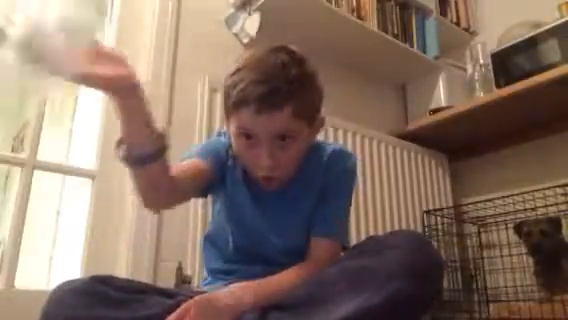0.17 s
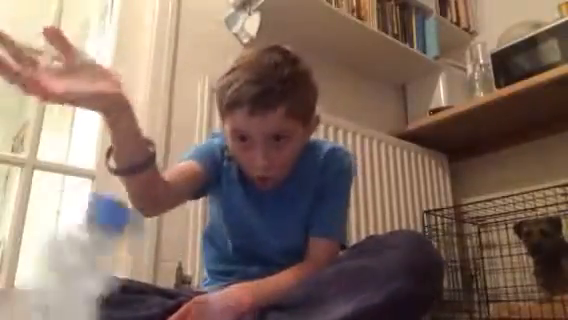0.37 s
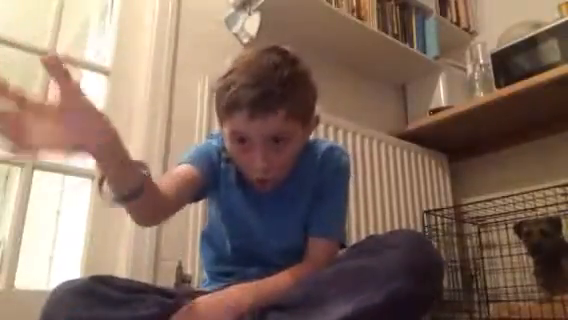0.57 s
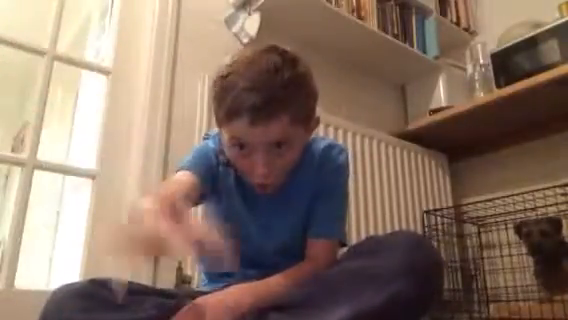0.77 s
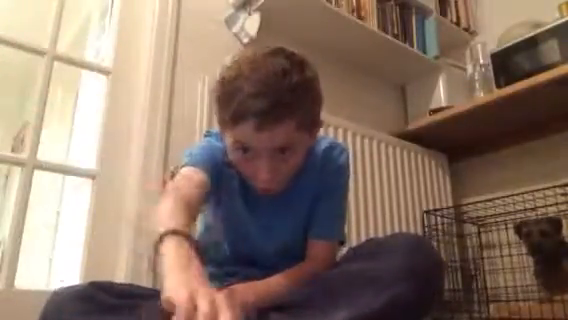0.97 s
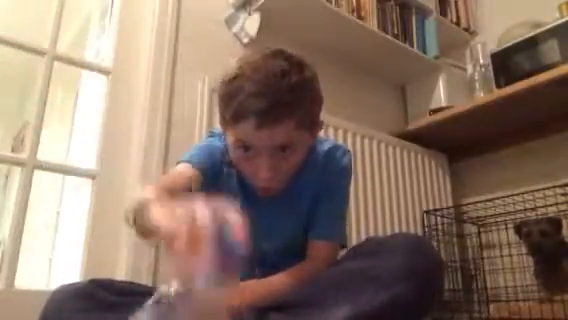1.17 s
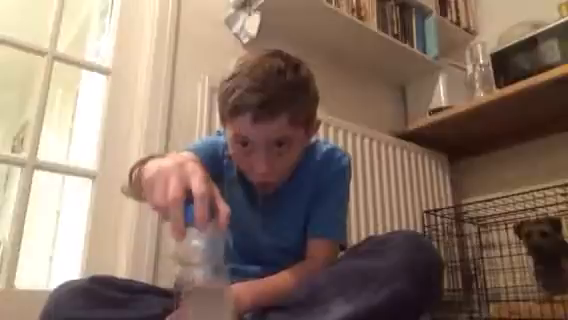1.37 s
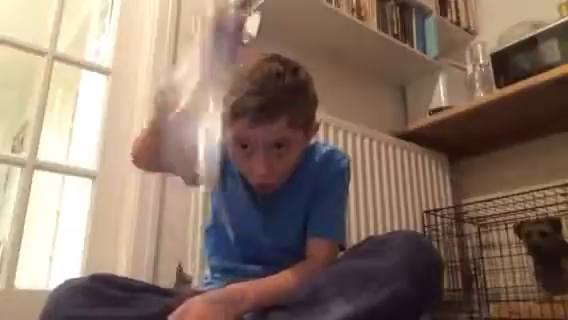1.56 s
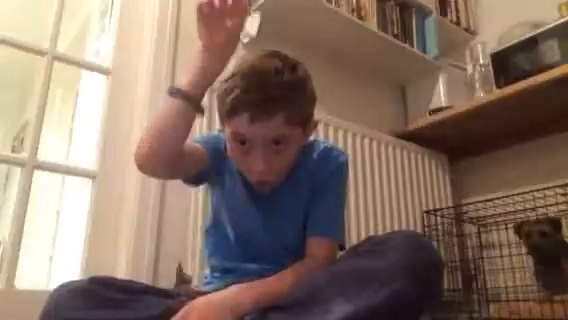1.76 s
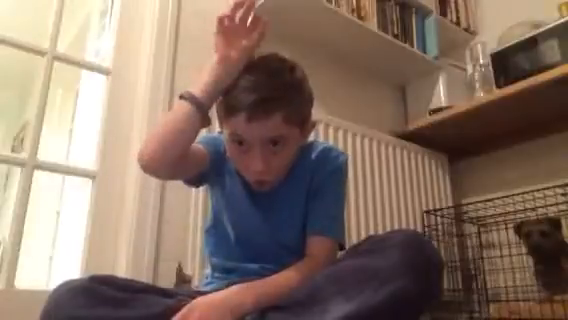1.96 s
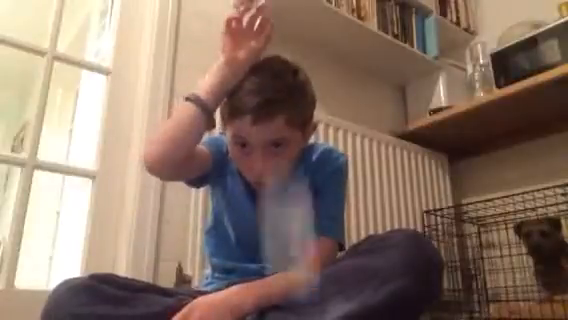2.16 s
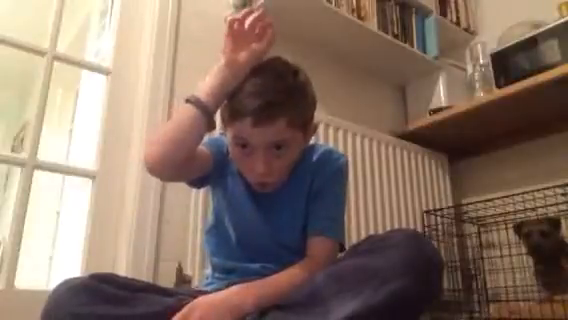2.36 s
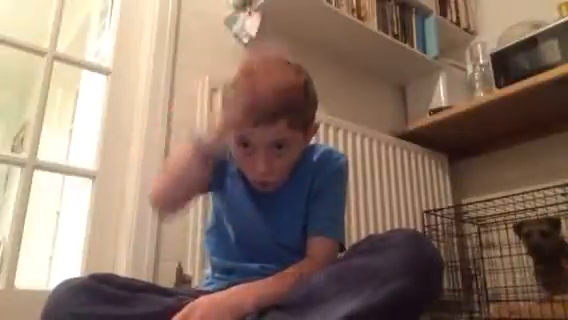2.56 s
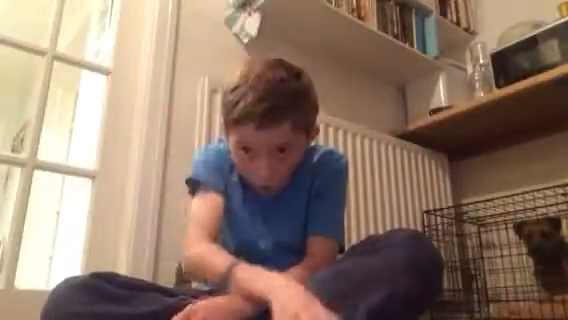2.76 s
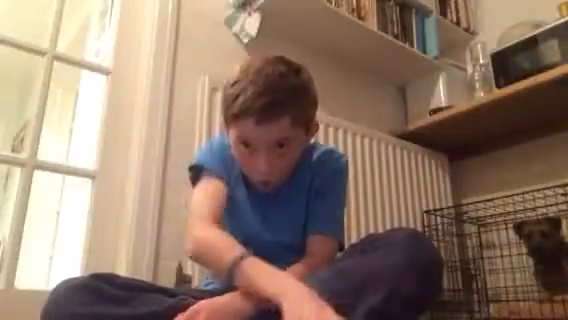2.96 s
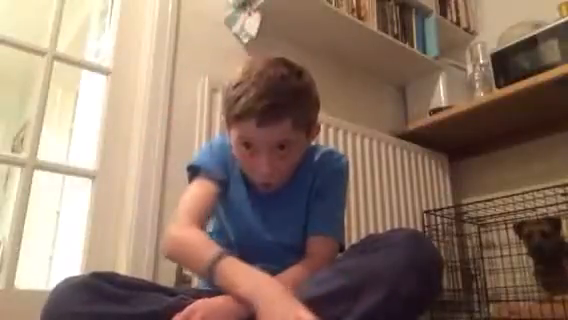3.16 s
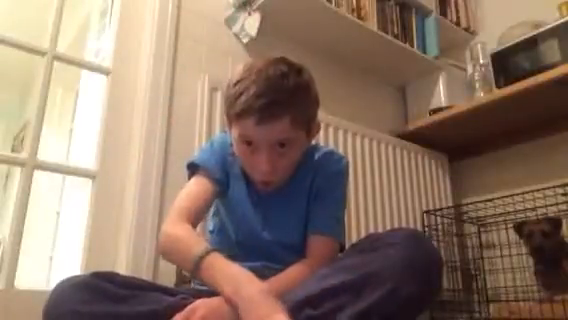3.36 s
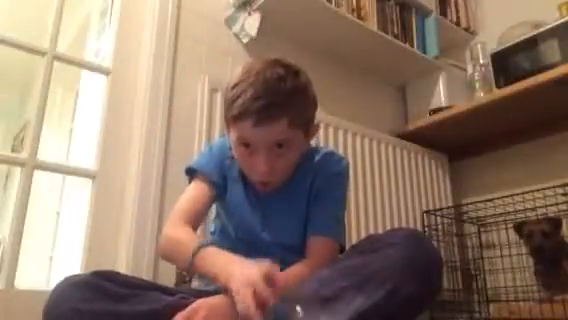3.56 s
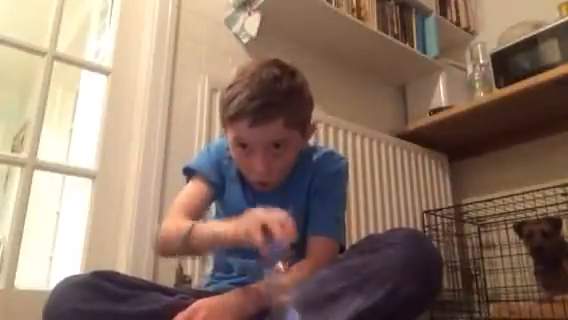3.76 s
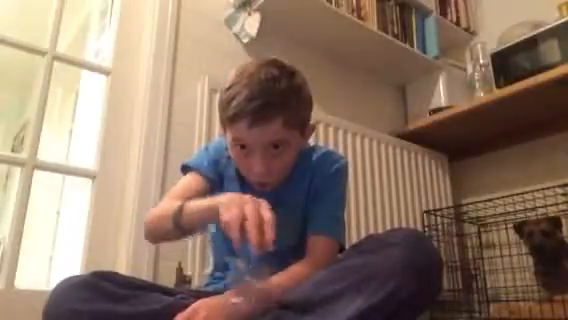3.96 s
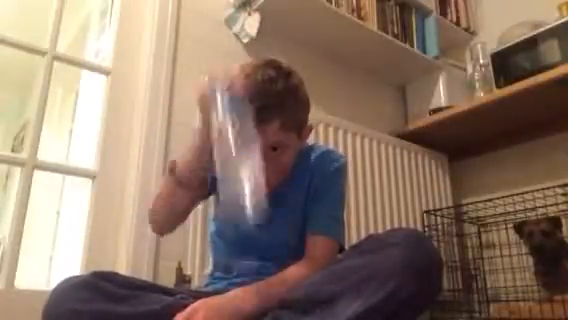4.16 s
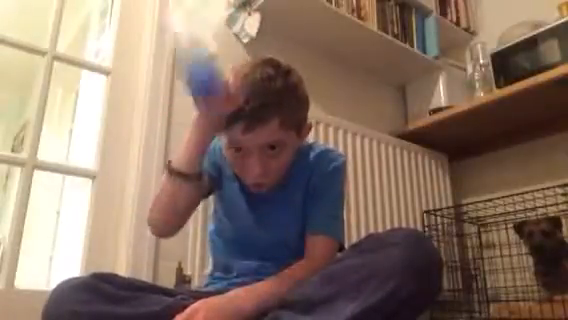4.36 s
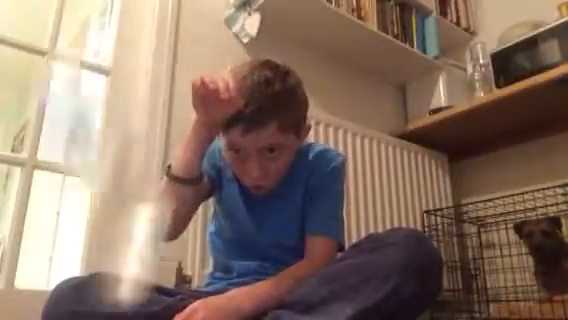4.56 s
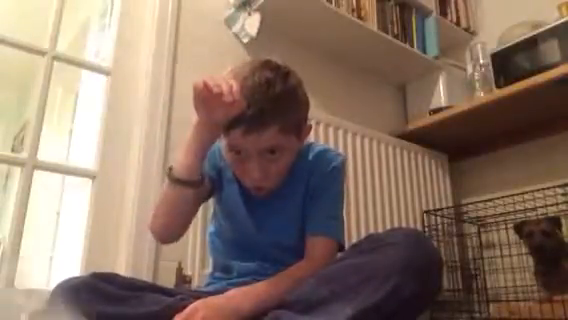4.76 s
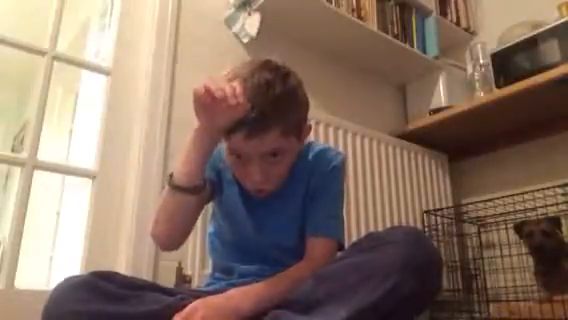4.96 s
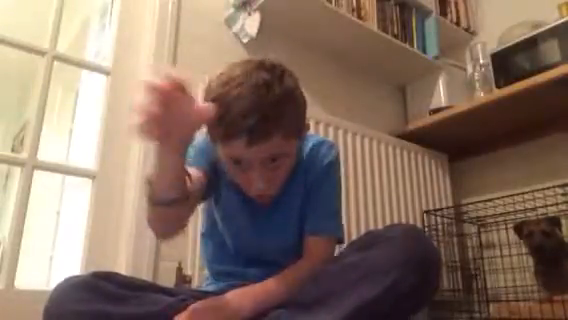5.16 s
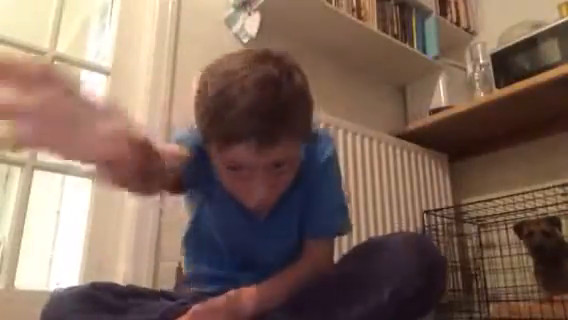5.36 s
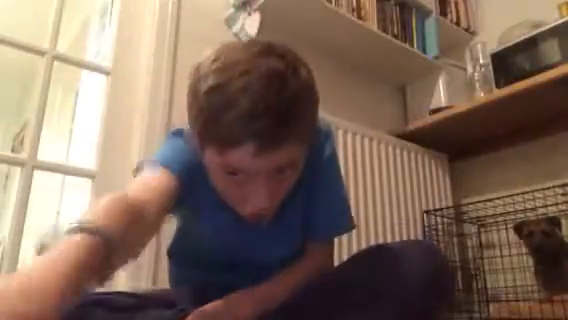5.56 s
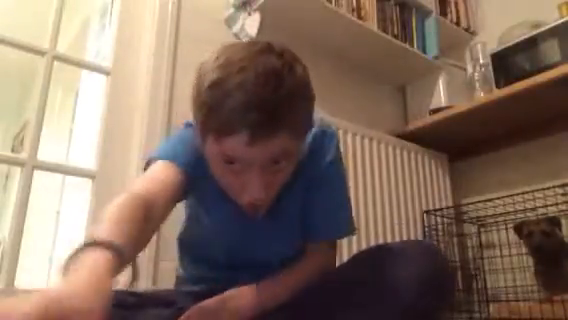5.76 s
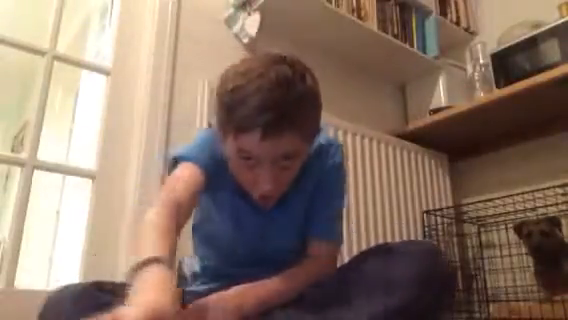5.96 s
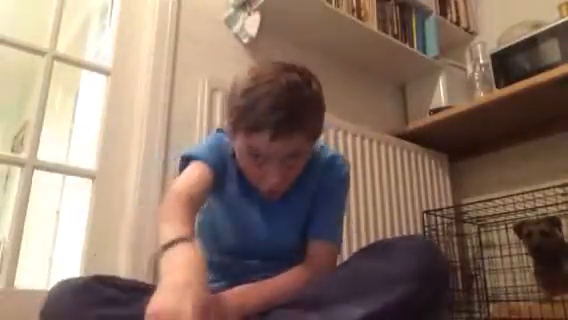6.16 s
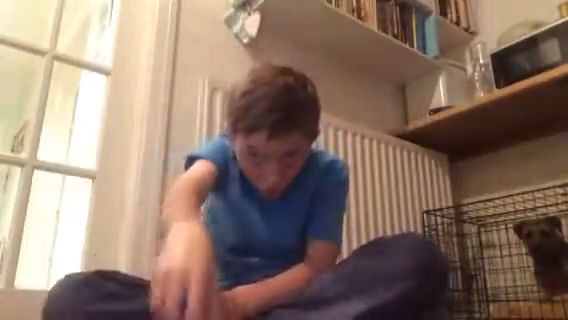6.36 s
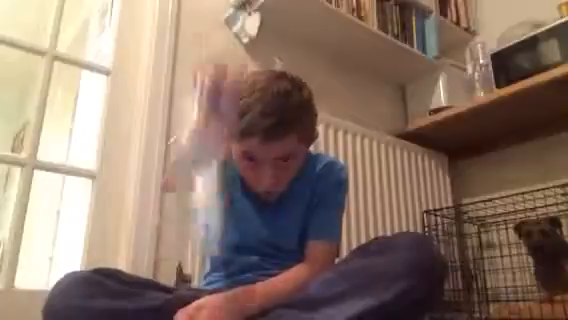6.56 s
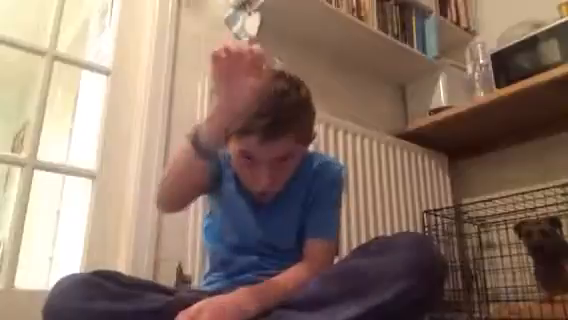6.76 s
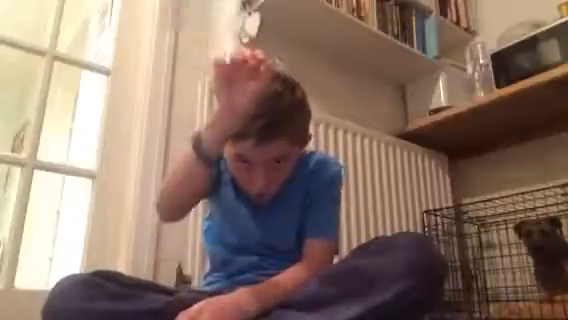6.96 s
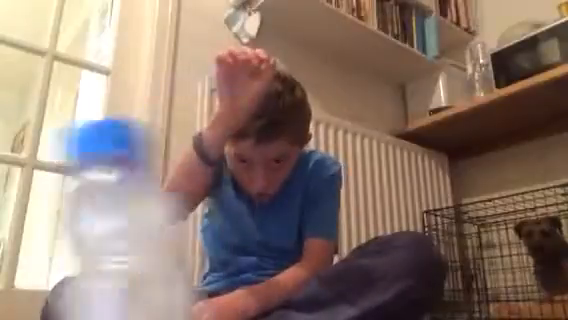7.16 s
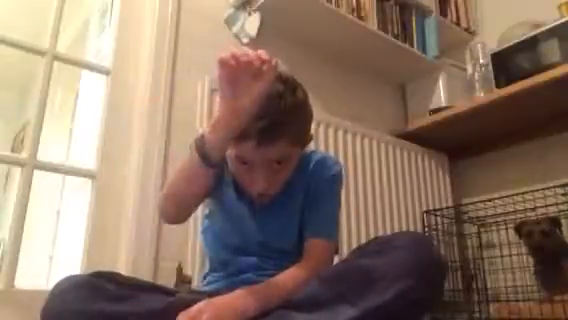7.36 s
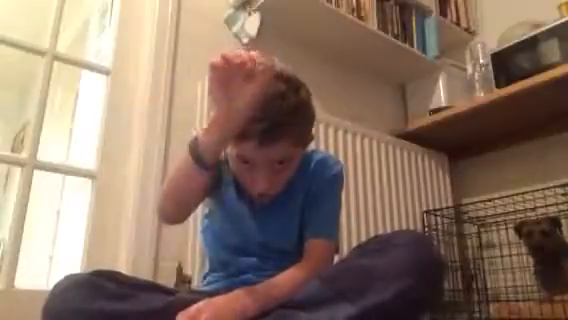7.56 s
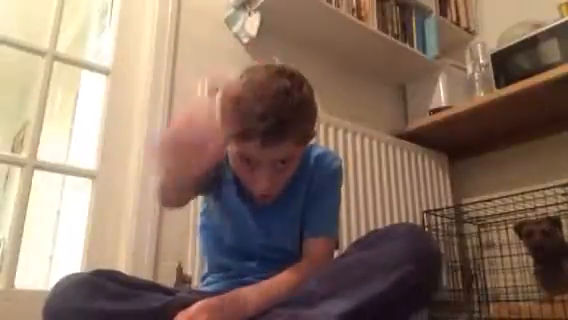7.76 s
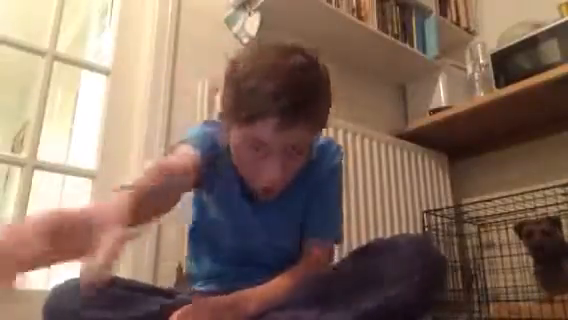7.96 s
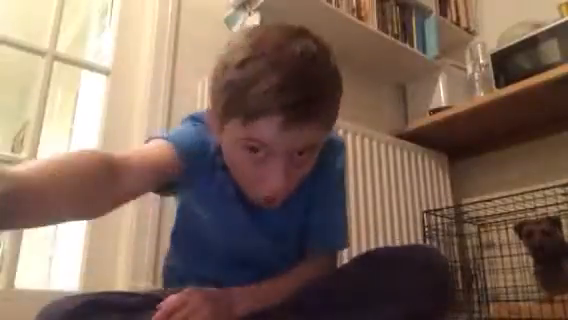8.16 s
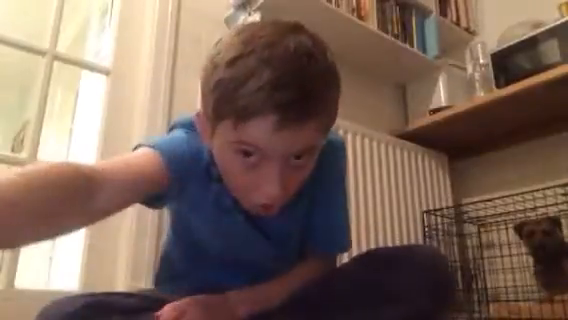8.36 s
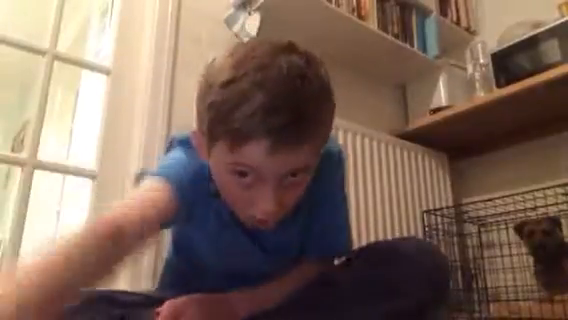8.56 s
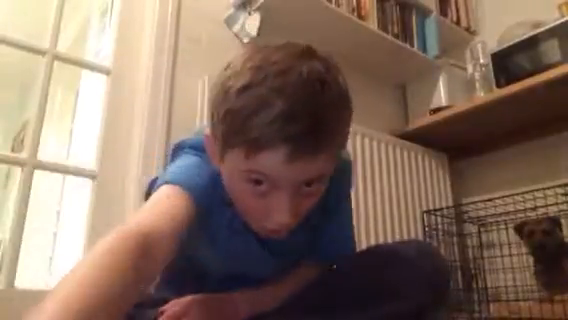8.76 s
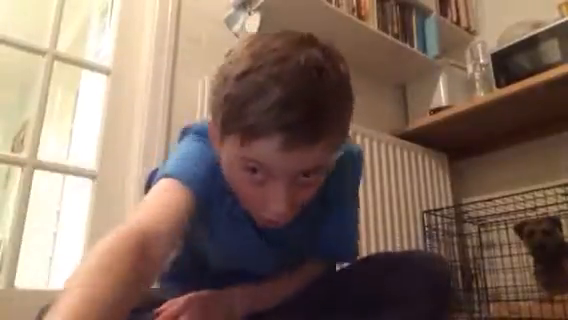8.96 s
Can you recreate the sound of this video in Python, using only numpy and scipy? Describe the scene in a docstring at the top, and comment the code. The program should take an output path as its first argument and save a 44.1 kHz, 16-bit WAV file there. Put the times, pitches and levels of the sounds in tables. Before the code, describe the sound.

Repeated bottle flips on a hard floor, heard close in a small live room. Each throw ends in a sharp hollow plastic thunk and a quick slosh of water. Most landings lead to a duller rebound, uneven rumbling and bumps; the second is followed by a quieter stretch of handling crackles. The last ends with busy knocks, scrapes and pops as the bottle is retrieved. Faint low room hush lies behind.

```python
"""A quiet room with a hard floor, heard by a small microphone close by: a light plastic bottle with a
little water is flipped. It lands with a thunk, water slaps inside, it bounces, rolls, is grabbed, crackles.
Blows: a push and clumped noise ring floor, wall and cap modes. Rolling, scraping, swishes: shaped noise.
Hums: noise on one gliding mode. A sparse-tap room tail and a faint hush lie behind."""
import sys
import numpy as np
from scipy import signal
from scipy.fft import rfft, irfft
from scipy.io import wavfile
from scipy.ndimage import uniform_filter1d

SR = 44100
rng = np.random.default_rng(int(sys.argv[2]) if len(sys.argv) > 2 else 0)


def transcribe(signal):
    """Save signal, clipped to [-1, 1], as a 16-bit WAV file at the path in sys.argv[1]."""
    frames = np.atleast_2d(signal).T
    limited = np.clip(frames, -1, 1)
    pcm = np.round(limited * 32767).astype(np.int16)
    wavfile.write(sys.argv[1], SR, pcm)


N = 400869


def amp(db):
    """Level in dB to amplitude factor."""
    return 10 ** (np.asarray(db) / 20)


def evened(x):
    """Scales x to unit RMS."""
    return x / np.sqrt(np.mean(x ** 2) + 1e-20)


def peaked(x, db, size):
    """Scales x so that its loudest stretch of size samples has RMS level db."""
    return amp(db) * x / np.sqrt(uniform_filter1d(x ** 2, size).max() + 1e-20)


def add(mix, start_s, sound):
    """Adds sound into mix at start_s, cut at the end of mix."""
    part = mix[round(start_s * SR):][:len(sound)]
    part += sound[:len(part)]


def colour(x, points):
    """Filters x by the gain curve (hz, db), interpolated over log frequency."""
    f, db = np.transpose(points)
    hz = np.fft.rfftfreq(len(x), 1 / SR)
    gain_db = np.interp(np.log(hz + 1), np.log(f + 1), db)
    return irfft(rfft(x) * amp(gain_db), len(x))


def ring(x, modes):
    """Sums x through one-pole complex resonances (hz, width_hz, db) of alternating sign."""
    out = 0
    for k, (hz, width_hz, db) in enumerate(modes):
        pole = np.exp((2j * np.pi * hz - np.pi * width_hz) / SR)
        mode = signal.lfilter([1 - abs(pole)], [1, -pole], x).imag
        out = out + (-1) ** k * amp(db) * mode
    return out


# background noise spectrum: freq_hz [Hz], density_db [dB per Hz, relative]
HUSH_SPECTRUM = [(15, -52.5), (25, -24), (102, -8), (212, -14.5), (317, -17.5), (1020, -31), (9320, -37),
                 (16000, -50)]
HUSH_DB = -68


def hush():
    """Steady noise with the background spectrum."""
    return amp(HUSH_DB) * evened(colour(rng.standard_normal(N), HUSH_SPECTRUM))


# crack and scrape spectrum: freq_hz [Hz], density_db [dB per Hz, relative]
CRACK_SPECTRUM = [(590, -17), (1000, -2.5), (1670, -7), (3420, -6), (11800, -12), (15100, -21.5),
                  (16000, -55.5)]
# floor modes: freq_hz [Hz], width_hz [Hz], gain_db [dB]
FLOOR_MODES = [(58.3, 65, 7.5), (91, 300, 7.5), (298, 90, 5)]
# bottle wall modes: freq_hz [Hz], width_hz [Hz], gain_db [dB]
WALL_MODES = [(467, 140, 5.5), (690, 83, 1.5), (920, 100, 2), (1330, 160, -8.5), (1706, 160, -7.5)]
THUMP_HZ, CAP_HZ = 169.1, 3155
SLOSH_HOLD = 1.186  # decay exponent: above 1 holds on at first, then dies quickly
PITCH_FADE = 0.34  # decay of the wall's own pitch, share of t60_s
SWAY, SWAY_S = .07, .04  # moving water bends the wall: RMS share of speed, smoothing time


def blow(crack_db, wall_db, thump_db, wall_hz, crack_hz, thump_t60_s, t60_s, slap_db, ping_db,
         bright_db=0, boom_db=5.0, grit_db=3.5, pitch_db=9.5, knock_db=-9.5, dent_hz=None, dent_db=5,
         knock_hz=219, knock_width_hz=220):
    """A short push, then clumps of slapping water, ring the floor, the wall and the cap."""
    t = np.arange(SR // 2) / SR
    noise, wall_noise, crack_noise, clump_noise, sway_noise = rng.standard_normal((5, len(t)))

    # drives
    push = np.exp(-t / 0.00031) * (1 - np.exp(-t / 0.000087))
    clumps = amp(grit_db * evened(uniform_filter1d(clump_noise, size=260)))
    slosh = amp(slap_db - 60 * (t / max(t60_s, .01)) ** SLOSH_HOLD)
    slap = slosh * clumps * (1 - np.exp(-t / 0.00079))
    shake = amp(slap_db - 60 * t / max(thump_t60_s, .01))

    thump = ring(2.0 * push + shake * noise, FLOOR_MODES + [(THUMP_HZ, 36, boom_db)])
    thump = peaked(thump, thump_db, size=400)

    # base buckles
    dent = ring(-push, [(dent_hz or wall_hz, 200, 0)])
    dent = peaked(dent, wall_db + dent_db, size=120)

    knock_mode = [(knock_hz, knock_width_hz, 0)]
    knock = ring(ring(-push, knock_mode), knock_mode)
    knock = peaked(knock, thump_db + knock_db, size=200)

    pitch_fade = amp(-60 * (t / max(PITCH_FADE * t60_s, .01)) ** 2)
    wall = ring(1.9 * push + slap * wall_noise, WALL_MODES)
    wall = wall + ring(2 * push + slap * noise * pitch_fade, [(wall_hz, 45, pitch_db)])
    sway_size = round(SWAY_S * SR)
    sway = uniform_filter1d(uniform_filter1d(sway_noise, sway_size), sway_size)
    sway = SWAY * evened(sway)
    wall = np.interp(np.cumsum(1 + sway - sway[0]) / SR, t, wall)  # pitch bend by time warp
    wall = peaked(wall, wall_db, size=250)

    click = amp(16 + .6 * slap_db) * np.exp(-t / 0.0015) * crack_noise
    snap = colour(click + slap * crack_noise, CRACK_SPECTRUM)
    snap = colour(snap, [(4000, 0), (14000, bright_db)])
    # low taps and taps near the cap pitch ring longest
    ping_width_hz = min(100 + .2 * abs(crack_hz - CAP_HZ), crack_hz / 6)
    ping = ring(click + 0.1 * slap * crack_noise, [(crack_hz, 3 * ping_width_hz, 0)])
    ping = ring(ping, [(crack_hz, ping_width_hz, 0)])
    crack = peaked(snap, crack_db, size=150) + peaked(ping, crack_db + ping_db, size=150)

    return (thump + dent + knock + wall + crack) * np.cos(np.pi * t) ** 2


# base comes down from a flip: start_s [s], crack_db [dB], wall_db [dB], thump_db [dB], wall_hz [Hz],
# t60_s (slosh) [s], slap_db (water over first blow) [dB], bright_db (top treble) [dB],
# pitch_db (strength of wall pitch) [dB], buckle_hz [Hz]
FLIP_LANDINGS = [(0.354, -18.5, -13.5, -17, 608.6, 0.37, 32, -11, 20, 290),
                 (2.2998, -18.5, -15.5, -24, 504, 0.43, 17, -8.5, 8, 400),
                 (4.7014, -27, -13, -20, 880, 0.3, 22, -4, 12, 310),
                 (7.1826, -23.5, -12, -18, 548, 0.39, 17, -1, 16, 300)]
GRAZE_LEAD_S = .012


def landings():
    """A rim grazes the floor, then the base hits, buckles and the water slaps."""
    out = np.zeros(N)
    for (start_s, crack_db, wall_db, thump_db, wall_hz, t60_s, slap_db, bright_db, pitch_db,
         buckle_hz) in FLIP_LANDINGS:
        hit = blow(crack_db, wall_db, thump_db, wall_hz, CAP_HZ, 0.71 * t60_s, t60_s, slap_db, -13.0,
                   bright_db, pitch_db=pitch_db, dent_hz=buckle_hz, dent_db=5.5)
        graze = blow(crack_db - 30, wall_db - 22, thump_db - 17, wall_hz, CAP_HZ, .08, .08, slap_db, 3)
        add(out, start_s, hit)
        add(out, start_s - GRAZE_LEAD_S, graze)
    return out


# room decay: freq_hz [Hz], t60_s [s]
ROOM_DECAY = [(60, 0.27), (400, 0.4), (2000, 0.44), (12000, 0.52)]


def room(x):
    """Convolves x with sparse taps of random sign, each band dying at its own speed."""
    taps = np.zeros(SR // 2)
    at = np.arange(200, len(taps) - 20, 20)
    at = at + rng.integers(0, 20, len(at))
    taps[at] = rng.choice([-1., 1.], len(at))
    hz, t, bands = signal.stft(taps, SR, nperseg=256)
    f, t60_s = np.transpose(ROOM_DECAY)
    band_t60_s = np.interp(np.log(hz + 1), np.log(f), t60_s)[:, None]
    tail = signal.istft(bands * amp(-60 * t / band_t60_s), SR, nperseg=256)[1]
    return signal.fftconvolve(x, tail / np.linalg.norm(tail))[:N]


# bottle bounces back flat: start_s [s], crack_db [dB], wall_db [dB], thump_db [dB], t60_s (slosh) [s],
# knock_hz [Hz], knock_width_hz [Hz]
FLAT_BOUNCES = [(0.6058, -28, -26, -24, 0.13, 219, 221), (4.917, -26.5, -28, -23, 0.25, 215, 241),
                (5.5843, -26, -31, -21, 0.19, 168.6, 44), (7.478, -27.5, -24, -27.5, 0.3, 220.4, 219)]
BASE_HZ = 471


def bounces():
    """Blows with a weak water slap and a strong low knock."""
    out = np.zeros(N)
    for start_s, crack_db, wall_db, thump_db, t60_s, knock_hz, knock_width_hz in FLAT_BOUNCES:
        hit = blow(crack_db, wall_db, thump_db, BASE_HZ, CAP_HZ, 1.1 * t60_s, t60_s, 4, -12.0, -1.1,
                   boom_db=4, knock_db=10, knock_hz=knock_hz, knock_width_hz=knock_width_hz)
        add(out, start_s, hit)
    return out


# rolling and rubbing under the hand, one list per spell: time_s [s], rumble_db [dB], scrape_db [dB]
ROLL_LEVELS = [
    [(.68, -43, -46.5), (1.05, -54, -79), (1.18, -52, -68.5), (1.35, -80.5, -62.5), (1.6, -68, -83)],
    [(2.5, -43, -70.5), (3, -58.5, -69), (3.67, -64.5, -71.5), (3.95, -74, -80)],
    [(5.36, -67, -80), (5.45, -58, -72), (5.7, -63, -65.5), (5.83, -49, -55), (5.96, -47.5, -47),
     (6.07, -52, -63), (6.19, -41, -53.5), (6.33, -59, -70), (6.46, -56, -71), (6.65, -95.5, -81)],
    [(8.02, -99, -70.5), (8.4, -53.5, -76.5), (8.56, -85, -72), (8.63, -53, -46), (8.75, -80, -68),
     (9.09, -52, -57.5)],
]
# rolling spectrum: freq_hz [Hz], density_db [dB per Hz, relative]
RUMBLE_SPECTRUM = [(18, -60.5), (30, -3), (102, 5), (280, -5.5), (400, -11), (520, -32.5), (880, -120)]
# cap mode: freq_hz [Hz], width_hz [Hz], gain_db [dB]
CAP_MODES = [(3700, 1300, 0)]
SLIPS_PER_S = 300


def rolling():
    """Ribbed bottle rumbles unevenly; skin scrapes the wall in tiny slips; both set the wall humming."""
    rows = []
    for spell in ROLL_LEVELS:
        rows += [(spell[0][0] - .05, -90, -90), *spell, (spell[-1][0] + .05, -90, -90)]
    time_s, rumble_db, scrape_db = np.transpose(rows)
    t = np.arange(N) / SR
    rumble_amp = amp(np.interp(t, time_s, rumble_db))
    scrape_amp = amp(np.interp(t, time_s, scrape_db))

    rumble_noise, wall_noise, slip_noise, lump_noise = rng.standard_normal((4, N))
    lumps = amp(3.0 * evened(uniform_filter1d(lump_noise, size=900)))
    slip_gain = amp(3.5 * np.minimum(rng.exponential(1, N), 4))
    slips = slip_noise * (0.33 + slip_gain * (rng.random(N) < SLIPS_PER_S / SR))

    rumble = evened(colour(rumble_noise * lumps, RUMBLE_SPECTRUM))
    scrape = evened(colour(slips * np.sqrt(lumps), CRACK_SPECTRUM))
    scrape = scrape + amp(-8.0) * evened(ring(slips, CAP_MODES))
    wall = ring(wall_noise * np.sqrt(lumps), WALL_MODES + [(724, 53, 0.88)])
    wall = evened(ring(wall, [(838, 640, 0.5), (1750, 170, -1.0)]))
    wall_amp = amp(-18.5) * rumble_amp + amp(-1.5) * scrape_amp
    return rumble_amp * rumble + wall_amp * wall + scrape_amp * scrape


# light bumps on the floor: start_s [s], thump_db [dB], wall_db [dB], crack_db [dB], wall_hz [Hz]
FLOOR_BUMPS = [(0.7102, -33.5, -36.5, -85, 444), (0.9316, -41, -45.5, -31, 950),
               (0.9663, -47, -47.5, -38.5, 950), (1.182, -42.5, -49, -72, 300),
               (2.4714, -30, -32.5, -36, 467), (3.503, -44.5, -52, -58.5, 930), (3.654, -49, -55, -87, 400),
               (5.8401, -44.5, -56, -38.5, 700), (6.246, -40, -37.5, -47, 930),
               (7.534, -21.5, -33.5, -32.5, 651), (8.306, -32.5, -37, -41.5, 360),
               (8.3671, -32.5, -38, -40, 625), (8.3949, -32.5, -37, -46.5, 636),
               (8.508, -41.5, -38.5, -40, 680), (8.6367, -32.5, -42.5, -33, 990),
               (8.6794, -31, -33.5, -39.5, 364), (8.92, -31, -32, -42, 773), (8.932, -40.5, -34, -48, 830),
               (8.9606, -39, -34.5, -50, 816), (9.0503, -32.5, -34, -42, 464)]
BUMP_T60_S = 0.11


def bumps():
    """Short, gritty blows with a strong wall pitch and dent."""
    out = np.zeros(N)
    for start_s, thump_db, wall_db, crack_db, wall_hz in FLOOR_BUMPS:
        hit = blow(crack_db, wall_db, thump_db, wall_hz, CAP_HZ, 2.3 * BUMP_T60_S, BUMP_T60_S, 0, -9, -3,
                   grit_db=6.5, pitch_db=15.5, dent_db=8.5, knock_db=1.0)
        add(out, start_s, hit)
    return out


# squeezed or flexing plastic: start_s [s], level_db (of the ping) [dB], pitch_hz [Hz]
PLASTIC_CRACKLES = [(0.856, -40.5, 920), (0.9085, -36.5, 4830), (1.037, -44.5, 1070), (1.074, -48, 1180),
                    (1.1453, -51.5, 4830), (1.207, -50.5, 3600), (1.248, -56.5, 9000),
                    (1.3103, -45.5, 2100), (1.3328, -42.5, 1960), (1.518, -52, 5340), (2.742, -47, 1250),
                    (2.8498, -38, 3110), (2.853, -40, 2000), (2.896, -50, 3080), (2.9722, -45.5, 3120),
                    (3.006, -54.5, 1000), (3.0703, -41, 3180), (3.1492, -41, 6840), (3.2216, -47.5, 3200),
                    (3.246, -46, 3250), (3.3581, -48, 5050), (3.7684, -51.5, 1500), (3.7959, -50, 2780),
                    (3.809, -45, 2030), (3.84, -52, 4800), (4.6444, -53, 5900), (5.744, -48.5, 3100),
                    (5.815, -50, 4400), (5.948, -43.5, 3950), (6.372, -40, 1360), (6.3772, -39, 8400),
                    (7.1391, -41, 3360), (8.321, -46, 2960), (8.587, -41, 4250), (8.6152, -41, 3000),
                    (8.637, -32, 3120), (8.79, -39.5, 1745)]
CRACKLE_T60_S = 0.17
PING_DB, PING_DB_PER_OCTAVE = 6, -3.5  # ring over hiss at CAP_HZ; lower pops ring more


def crackles():
    """Pops of plastic: blows led by a ping at their own pitch."""
    out = np.zeros(N)
    for start_s, level_db, pitch_hz in PLASTIC_CRACKLES:
        ping_db = PING_DB + PING_DB_PER_OCTAVE * np.log2(pitch_hz / CAP_HZ)
        pop = blow(level_db - ping_db, level_db - 14.5, level_db - 19.0, 1010, pitch_hz,
                   CRACKLE_T60_S, CRACKLE_T60_S, 7.9, ping_db, grit_db=-1.0)
        add(out, start_s, pop)
    return out


# air and water sweep through the bottle: start_s [s], level_db [dB], t60_s (swish) [s],
# top_db (top mode and swish over low modes, before their trims) [dB]
THROW_SWEEPS = [(1.72, -51, 0.32, -2.5), (4.3, -57, 0.43, 2.5), (6.7, -55.5, 0.11, 2.5),
                (6.729, -52, 0.28, 12)]
# air in the bottle, two low modes and a top one: freq_hz [Hz], width_hz [Hz], gain_db [dB]
AIR_MODES = [(460, 70, -2), (1060, 45, 3), (3280, 260, -6)]


def air_hum(air, modes):
    """Noise through the air modes, then again through broader ones."""
    broad = [(hz, 5 * width_hz, 0) for hz, width_hz, _ in modes]
    return evened(ring(ring(air, modes), broad))


def throws():
    """A soft swish and the humming of the air in the bottle."""
    out, t = np.zeros(N), np.arange(SR // 2) / SR
    for start_s, level_db, t60_s, top_db in THROW_SWEEPS:
        air = rng.standard_normal(len(t)) * (1 - np.exp(-t / 0.0064))
        hum_drive = air * amp(-60 * t / (0.74 * t60_s))
        low = air_hum(hum_drive, AIR_MODES[:2])
        top = air_hum(hum_drive, AIR_MODES[2:])
        swish = evened(colour(air * amp(-60 * t / t60_s), CRACK_SPECTRUM))
        sweep = low + amp(top_db) * (amp(-3.0) * top + amp(-6.0) * swish)
        add(out, start_s, peaked(sweep, level_db, size=900))
    return out


# bottle hums on one gliding mode: start_s [s], length_s [s], first_hz [Hz], last_hz [Hz], # level_db (before
# the swell) [dB]
GLIDING_HUMS = [(2.888, 0.7, 510.4, 659, -65), (5.8, 0.26, 676.4, 800, -49), (5.8, 0.13, 2920, 2824, -54),
                (3.232, 0.051, 647, 615, -51), (6.255, 0.81, 477, 449, -64), (8.561, 0.21, 995, 986, -54),
                (8.907, 0.17, 777, 648, -46.5)]
HUM_WIDTH = .14  # width of each of two poles, share of first_hz


def hums():
    """Noise one mode wide that swells, glides and fades."""
    out = np.zeros(N)
    for start_s, length_s, first_hz, last_hz, level_db in GLIDING_HUMS:
        real, imag = rng.standard_normal((2, SR))[:, :round(length_s * SR)]
        u = np.linspace(0, 1, len(real))
        pole = np.exp(-np.pi * HUM_WIDTH * first_hz / SR)
        fuzz = signal.lfilter([1], np.poly([pole, pole]), real + 1j * imag)
        pitch_hz = first_hz + (last_hz - first_hz) * u
        tone = (fuzz * np.exp(2j * np.pi * np.cumsum(pitch_hz) / SR)).real
        swell = np.sin(np.pi * u ** 0.6)
        add(out, start_s, amp(level_db) * swell * evened(tone))
    return out


def scene():
    """Sums the bottle's sounds, their room tail and the hush."""
    near = landings() + bounces() + rolling() + bumps() + crackles() + throws() + hums()
    return (near + amp(-8.5) * room(near) + hush())[None]


BASS_CUT_HZ, BAND_LIMIT_HZ = 42, 15700


def record(dry):
    """The small microphone drops the deepest bass; then the band limit."""
    bass_cut = signal.butter(3, BASS_CUT_HZ, "high", fs=SR, output="sos")
    thin = signal.sosfilt(bass_cut, dry)
    band_limit = signal.firwin(511, BAND_LIMIT_HZ, window=("kaiser", 9), fs=SR)
    return signal.oaconvolve(thin, band_limit[None], "same")


dry = scene()
out = record(dry)
transcribe(out)
```